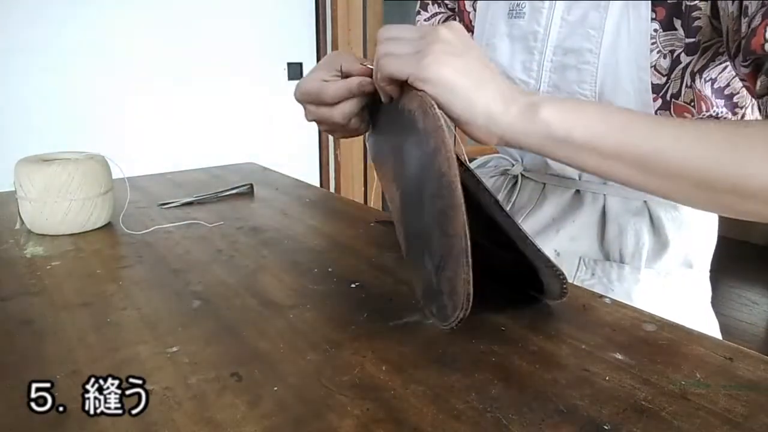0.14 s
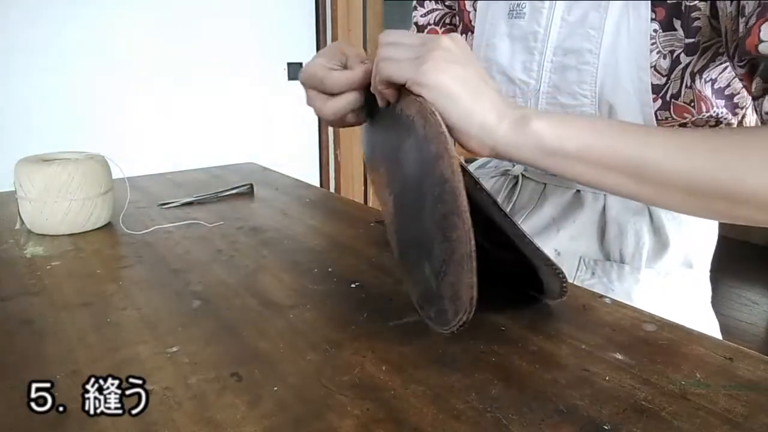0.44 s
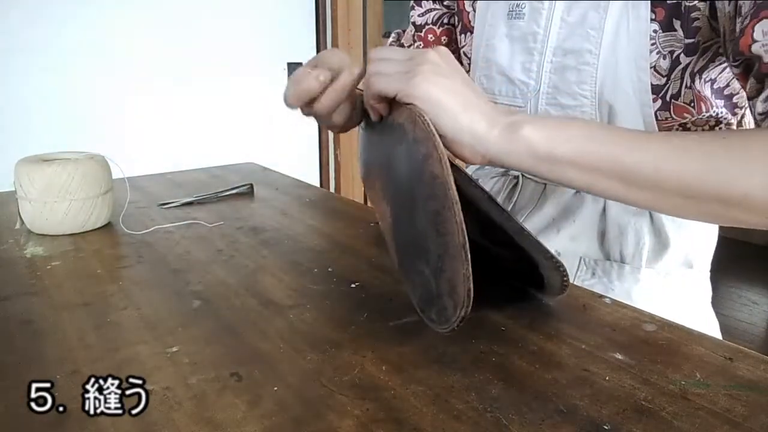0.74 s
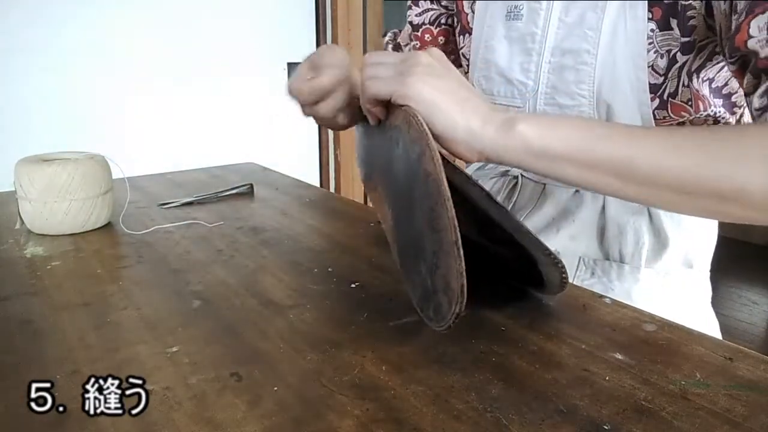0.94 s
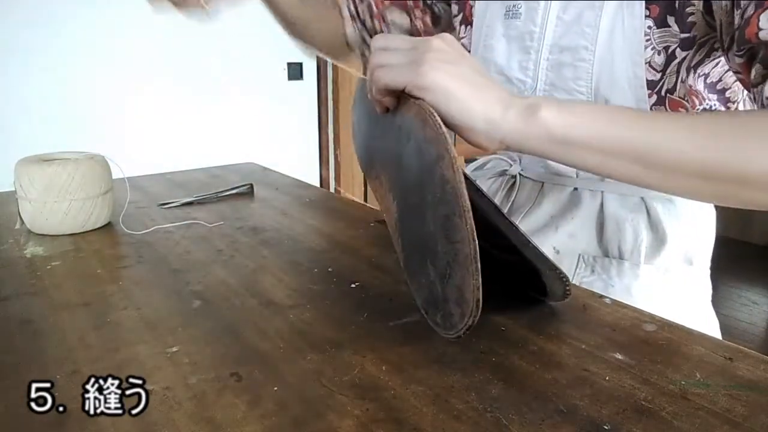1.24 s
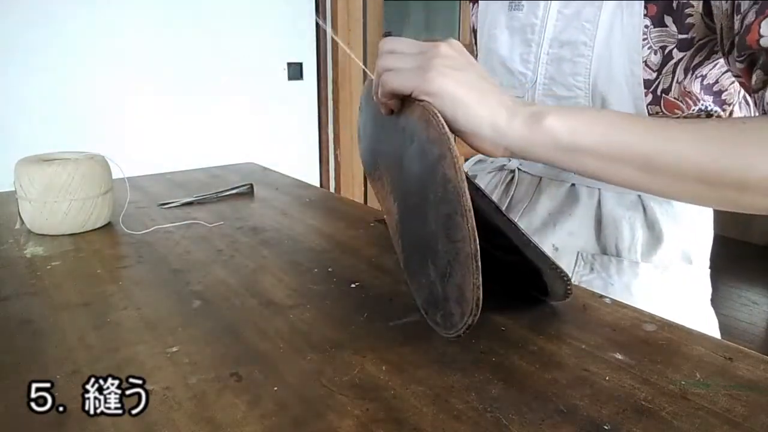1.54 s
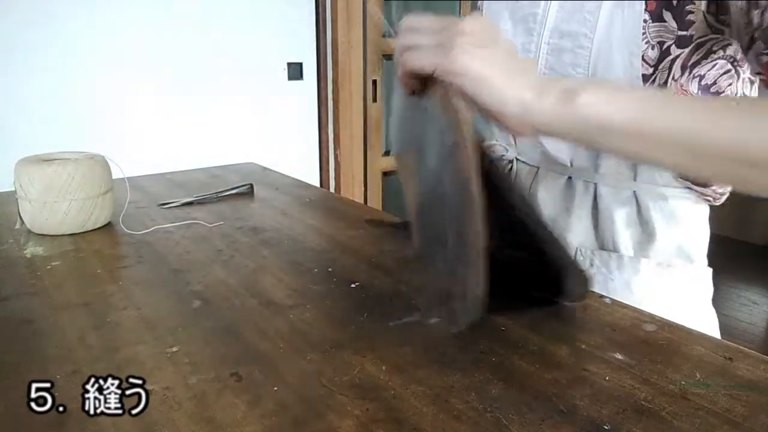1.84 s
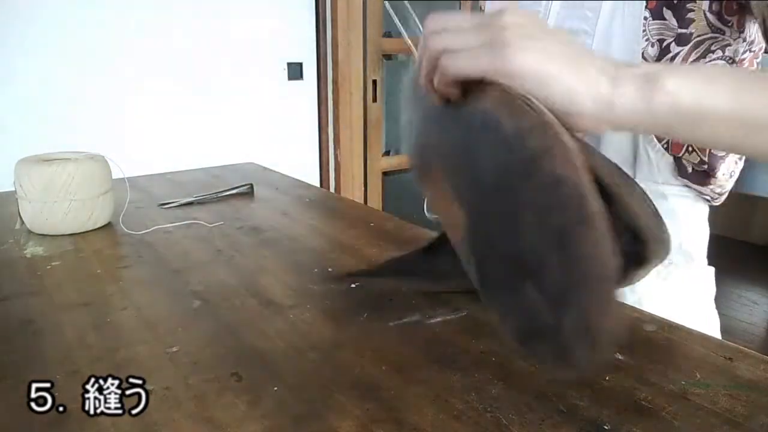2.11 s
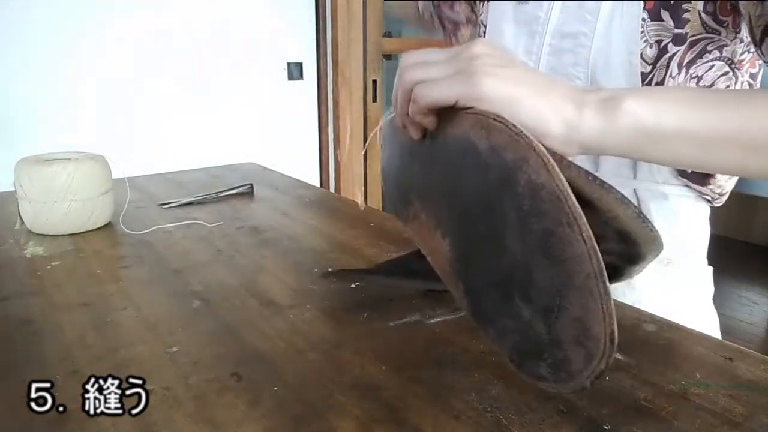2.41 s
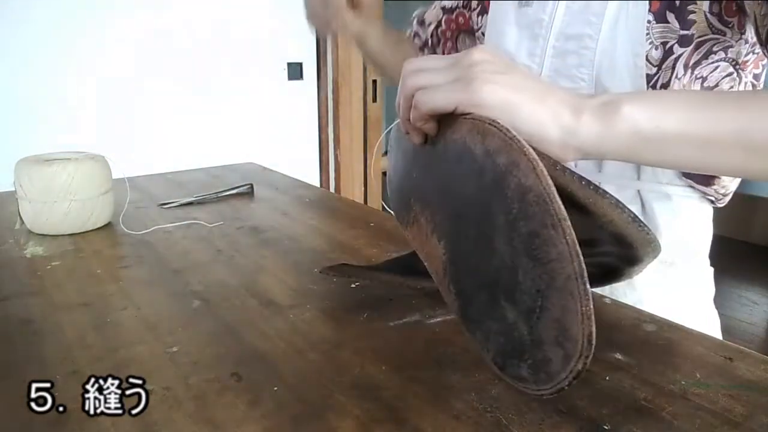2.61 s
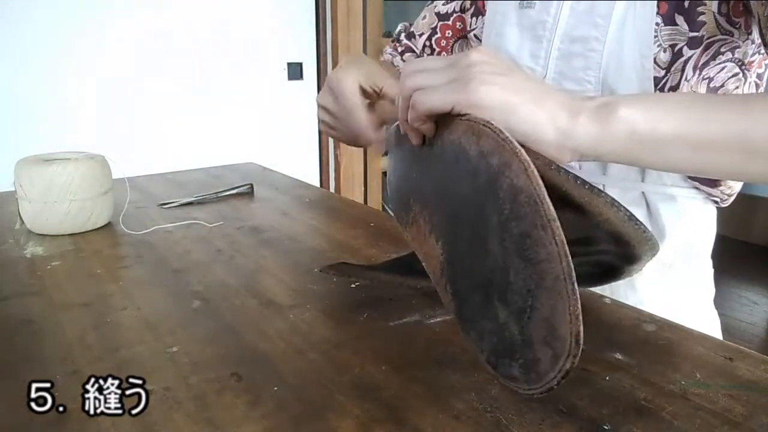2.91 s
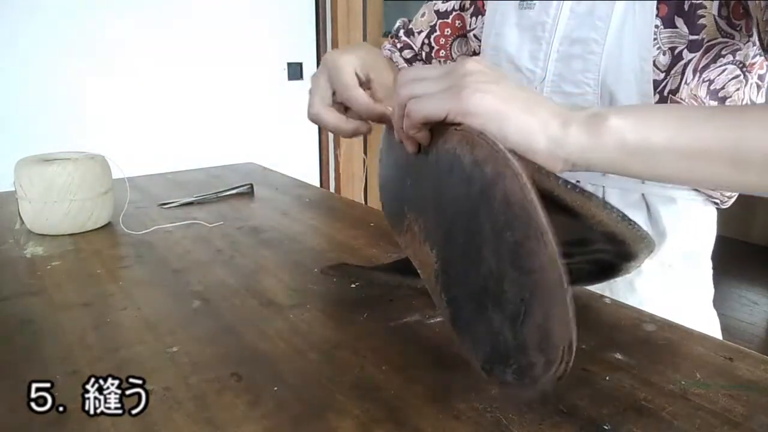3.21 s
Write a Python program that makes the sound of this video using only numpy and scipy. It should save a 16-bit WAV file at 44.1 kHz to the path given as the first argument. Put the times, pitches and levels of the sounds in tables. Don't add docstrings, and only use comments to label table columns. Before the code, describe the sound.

Thread is drawn through stiff leather with one long airy hiss, after low thumps on a wooden table; then leather scuffs, dull knocks and small ticks follow, ending with a heavy thump. Quiet small room, close stereo recorder.

```python
import sys
import numpy as np
from scipy import signal
from scipy.fft import rfft, irfft, next_fast_len
from scipy.io import wavfile
from scipy.ndimage import uniform_filter1d

SR = 44100
rng = np.random.default_rng(int(sys.argv[2]) if len(sys.argv) > 2 else 0)


def invert_db(x):
    u = np.asarray(x, float) / 20
    return 10 ** u


def generate_wav(signal):
    frames = np.transpose(np.atleast_2d(signal))
    scaled = np.clip(frames, -1, 1) * 32767
    pcm = np.round(scaled).astype(np.int16)
    wavfile.write(sys.argv[1], SR, pcm)


N = 147735

# frequency in Hz, density in dB per Hz.
HISS_SPECTRUM = [(12, -43), (20, 0), (60, -12.5), (146, -19.5), (357, -27), (600, -29), (2500, -35),
                 (6910, -35.5), (16000, -34)]
# time in seconds, scuff level in dB, table rumble relative to it in dB,
# the sheet's lowest mode relative to its other modes in dB.
SHIFT = [(0, -62.5, -5, -3), (.5, -87, 6.5, 17.5), (.8, -80, 3, 10), (1.0, -56.5, 5, -6),
         (1.2, -58, 2.5, 0.5), (1.5, -53.5, 6, -3.5), (1.7, -57.5, -6.5, 2.5), (1.85, -55.5, -1.5, 6),
         (1.98, -53, -9, 5), (2.07, -50, 1, 3.5), (2.15, -52, 4, 2), (2.3, -56, -0.5, -2),
         (2.55, -53.5, -13, -7), (2.85, -62, -13, -3), (2.97, -53, -3.5, -12), (3.1, -64, -2, -10),
         (3.25, -52, 10.5, 13.5), (3.35, -51, -1.5, -2)]
# frequency in Hz, width in Hz, level in dB.
LEATHER_MODES = [(289, 83, -0.5), (541, 88, 1), (743, 118, -2), (1070, 370, -6), (1390, 690, -11)]
# frequency in Hz, level in dB, T60 in seconds.
TABLE_HELD = [(55.6, -12, 0.17), (92, -5, 0.1), (132.6, -0.5, 0.09), (190, -13.5, 0.11)]
# time in seconds, level in dB, lower resonances relative to it in dB,
# edge scrape relative to it in dB.
DRAG = [(.93, -59.5, 2.5, -3), (.97, -52.5, 5, -8), (1.15, -52, 1, -7), (1.26, -51.5, 3.5, -3),
        (1.3, -47.5, 1, -12), (1.45, -47, 2, -6), (1.6, -48.5, 1, -8), (1.74, -47.5, -0.5, -5),
        (1.82, -48.5, -1.5, -6.5), (1.9, -51, -1, -0.5), (1.97, -48, -1.5, -1.5), (2.04, -47, -0.5, -3.5),
        (2.135, -53.5, 0.5, -1), (2.16, -57, 3, 0), (2.3, -63, 3, 1.5)]
# start in seconds, length in seconds, level in dB,
# lower resonances relative to it in dB.
BRUSHES = [(0, 0.025, -64, -7), (.27, 0.077, -65, -10), (0.428, 0.082, -59.5, -3), (0.515, 0.036, -57.5, 7),
           (2.196, 0.09, -70, -9), (2.347, 0.31, -64.5, -5), (2.883, 0.073, -62, -14),
           (2.942, 0.06, -59, 5), (3.008, 0.075, -64, 2), (3.092, 0.037, -66, 5), (3.27, 0.11, -55, -0.5)]
# frequency in Hz, width in Hz, level in dB.
HOLE_MODES = [(2500, 1400, -8.5), (3700, 1380, -3), (4735, 800, -6), (6640, 1600, -4), (8000, 2770, 0.5),
              (9800, 960, -5.5), (11260, 2200, -7), (14000, 4000, -10.5)]
# frequency in Hz, width in Hz, level in dB.
EDGE_MODES = [(1790, 2700, -7), (2900, 1100, -3), (5380, 1200, -1.5), (6200, 620, -2.5)]
# start in seconds, peak in dB, contact in seconds, share of the upper modes in dB.
THUMPS = [(0.163, -66, 0.01, -6), (0.276, -14, 0.012, -7.5), (0.371, -30.5, 0.014, -0.5),
          (0.504, -25, 0.016, -4.5), (0.545, -29, 0.026, 11), (0.618, -38.5, 0.0084, -3.5),
          (0.659, -48, 0.0077, -14), (0.867, -38, 0.021, -16), (0.965, -23.5, 0.019, -7.5),
          (1.016, -25, 0.012, -11), (1.215, -48.5, 0.006, 8.5), (1.288, -37.5, 0.012, 5),
          (1.331, -45, 0.012, 10), (1.439, -40, 0.0097, 4.5), (1.531, -37, 0.0071, -1.5),
          (2.037, -47.5, 0.0093, 10), (2.192, -34, 0.0085, 1.5), (2.204, -29, 0.0078, -9),
          (2.419, -33.5, 0.017, 4), (2.76, -53, 0.0069, -15), (2.892, -40, 0.011, 4),
          (2.954, -42, 0.012, 9.5), (3.108, -36.5, 0.014, 3), (3.183, -7.5, 0.0086, 1)]
# frequency in Hz, level in dB, T60 in seconds.
TABLE_LOW = [(143, 0, .16)]
# frequency in Hz, level in dB, T60 in seconds.
TABLE_LEGS = [(48, -28, .35), (94, -26, .3), (123, 3.5, .035)]
# frequency in Hz, level in dB, T60 in seconds.
TABLE_MID = [(206.3, -10, 0.2), (228.3, -8.5, 0.29), (259.6, -7.5, 0.22), (320, -13, 0.19)]
# frequency in Hz, level in dB, T60 in seconds.
TABLE_HIGH = [(458, -39, 0.18), (550, -41.5, 0.25), (859, -31, 0.091), (1195, -36.5, 0.047)]
# frequency in Hz, level in dB, T60 in seconds.
TABLE_RIM = [(513, -37, 0.13), (601, -37.5, 0.18), (937, -38, 0.21), (1400, -32, .04)]
# start in seconds, peak in dB, ring in Hz, width in Hz.
KNOCKS = [(.49, -57, 596, 150), (1.861, -45.5, 710, 500), (1.986, -52, 890, 900), (2.037, -48, 600, 400),
          (2.057, -42.5, 770, 700), (2.066, -45, 690, 500), (2.074, -49, 880, 800), (2.095, -41, 670, 500),
          (2.128, -43.5, 790, 700), (2.134, -49.5, 890, 800), (2.141, -47, 700, 700),
          (2.175, -50, 1100, 500), (2.196, -46, 600, 500), (2.2078, -35, 765, 450), (2.208, -53, 1400, 500),
          (2.217, -43, 780, 700), (2.33, -56, 586, 400), (2.3765, -40.5, 940, 845),
          (2.428, -46.5, 1090, 890), (2.508, -47, 1000, 810), (2.566, -54, 886, 700),
          (2.645, -54, 795, 600), (2.8945, -43, 895, 1400), (2.085, -51, 890, 600), (2.108, -51, 595, 500),
          (2.963, -49, 600, 500), (2.985, -49, 657, 500), (3.06, -54.5, 695, 500), (3.11, -50, 700, 600)]
# start in seconds, peak in dB, ring in Hz, width in Hz.
BUMPS = [(.895, -52, 68.6, 16), (1.21, -46, 225, 35), (1.215, -58, 292, 50), (1.285, -49, 59.6, 27),
         (1.33, -50, 87.5, 20), (1.352, -55, 290, 45), (1.44, -48.5, 108.6, 28), (1.475, -56, 190, 39),
         (1.535, -50, 92, 16), (1.59, -54, 242, 58), (1.665, -56, 350, 35), (1.885, -47.5, 250, 42),
         (2.21, -40.5, 108, 26), (3.187, -40, 660, 400), (2.385, -52.5, 302, 99)]
# start in seconds, peak in dB, ring in Hz, width in Hz, pan in dB.
TICKS = [(2.2066, -34.5, 7100, 3500, -1), (2.2072, -43.5, 2700, 700, -2), (2.2160, -39, 7460, 4000, 0),
         (2.2165, -46, 2600, 900, 8), (2.3620, -42, 7000, 5000, -1), (2.3768, -33.5, 7000, 6000, 0),
         (2.3770, -47, 3200, 1500, -7), (2.4294, -49, 3500, 3000, 2), (2.8942, -46, 4360, 1500, 3),
         (2.8944, -44, 7500, 4000, -3), (2.9635, -49.5, 2730, 1200, -2), (2.9640, -42, 7000, 4000, 0),
         (2.978, -55, 2900, 1210, 0), (3.0238, -34.5, 7750, 3000, 4), (3.0245, -45, 12300, 3000, 4),
         (3.118, -50, 2680, 800, 2), (3.1815, -43.5, 4930, 1210, -1), (3.1815, -45.5, 8000, 2000, -4),
         (3.2945, -47.5, 4230, 1790, 0), (3.3066, -42, 7400, 7000, 1), (3.3156, -34, 4800, 3600, -5),
         (3.3283, -39.5, 7740, 1800, 7), (3.3284, -41, 5650, 1480, -4), (3.3416, -39, 5700, 2500, -2)]

HISS_DB, ALIKE_BELOW_HZ = -50.5, 48
SCUFFS_PER_S, SCUFF_SPREAD_DB, SCUFF_FLICKER_DB = 2000, 2.5, 1.2
SHAKES_PER_S, SHAKE_SPREAD_DB = 150, 1.5
SLIPS_PER_S, SLIP_SPREAD_DB, SLIP_APART = 6000, 2.2, .62
DRAG_FLICKER_DB, HOLE_SWAY_DB = .8, .9
BRUSH_EDGE_S, BRUSH_FLICKER_DB, BRUSH_SCRAPE_DB = .03, 2.5, -8.5
THREAD_PAN_DB, LOWER_PAN_DB, TABLE_PAN_DB = 2.5, -1.5, -1.9
THUMP_LAG_S, THUMP_GAIN_DB, SKIN_SHARE = .0025, 9.5, 0.14
TICK_T60_S, KNOCK_T60_S, BUMP_T60_S = 0.007, 0.022, 0.059
RATTLE, RATTLE_ALIKE, TAP_GAIN_DB, TAP_LAG_S = 1.1, .7, 4, .0004
ROOM_T60_S, ROOM_DB = .2, -11
MIC_LOW_HZ, TOP_HZ, OFFSET = 38, 15740, -.0005
GATE_SPREAD_DB, GATE_FROM_HZ = 7.5, 2200


def unit(x):
    return x / np.sqrt(np.mean(x ** 2))


def band(x, hz, width_hz):
    hz = min(hz, .45 * SR)
    return signal.lfilter(*signal.iirpeak(hz, hz / width_hz, fs=SR), x)


def body(x, peaks):
    return sum((-1) ** k * invert_db(db) * band(x, hz, width) for k, (hz, width, db) in enumerate(peaks))


def steep(x, peaks):
    size = next_fast_len(x.shape[-1])
    f = np.fft.rfftfreq(size, 1 / SR)
    power = sum(invert_db(db) ** 2 / (1 + (2 * (f - hz) / width) ** 2) ** 2 for hz, width, db in peaks)
    return irfft(rfft(x, size) * np.sqrt(power), size)[..., :x.shape[-1]]


def ring(force, modes):
    out = 0
    for hz, db, t60 in modes:
        pole = np.exp(2j * np.pi * hz / SR - np.log(1000) / (t60 * SR))
        out = out + invert_db(db) * signal.lfilter([1], [1, -pole], force).imag
    return out


def walk(rate):
    k = int(SR / rate)
    return unit(uniform_filter1d(uniform_filter1d(rng.standard_normal(N), k), k))


def curve(rows, axis):
    rows = np.array(rows)
    return np.interp(np.arange(N) / SR, rows[:, 0], rows[:, axis])


def grains(per_s, spread_db):
    chance, sign, size = rng.random((3, N))
    return (chance < per_s / SR) * np.sign(sign - .5) * invert_db(-spread_db * np.log(1.003 - size))


def two_ports(per_s, spread_db, apart):
    a, b = (grains(per_s, spread_db) for _ in range(2))
    return np.array([a + apart * b, a - apart * b])


def pan(x, db):
    return x * invert_db(np.array([[db / 2], [-db / 2]]))


def hiss():
    hz = np.maximum(np.fft.rfftfreq(N, 1 / SR), 1)
    spectrum = np.array(HISS_SPECTRUM)
    gain = invert_db(np.interp(np.log(hz), np.log(spectrum[:, 0]), spectrum[:, 1]))
    alike = 1 / (1 + (hz / ALIKE_BELOW_HZ) ** 2)
    mid, side = rfft(rng.standard_normal((2, N))) * gain * np.sqrt([1 + alike, 1 - alike])
    return invert_db(HISS_DB) * unit(irfft(np.array([mid + side, mid - side]), N))


def leather():
    level_db = curve(SHIFT, axis=1) + SCUFF_FLICKER_DB * walk(24)
    rub = two_ports(SCUFFS_PER_S, SCUFF_SPREAD_DB, .5)
    scuff = invert_db(curve(SHIFT, axis=3)) * body(rub, LEATHER_MODES[:1]) - body(rub, LEATHER_MODES[1:])
    push = uniform_filter1d(grains(SHAKES_PER_S, SHAKE_SPREAD_DB), size=120)
    shake = unit(ring(push, TABLE_HELD))
    return invert_db(level_db) * unit(scuff), invert_db(level_db + curve(SHIFT, axis=2)) * shake


def hole(peaks, pan_db):
    out = 0
    for peak in peaks:
        slips = two_ports(SLIPS_PER_S, SLIP_SPREAD_DB, SLIP_APART)
        out = out + steep(slips, [peak]) * invert_db(HOLE_SWAY_DB * walk(5.6))
    return pan(out, pan_db) * invert_db(DRAG_FLICKER_DB * walk(23))


def thread():
    t = np.arange(N) / SR
    upper = invert_db(curve(DRAG, axis=1))
    lower = upper * invert_db(curve(DRAG, axis=2))
    edge = upper * invert_db(curve(DRAG, axis=3))
    fumble_db = BRUSH_FLICKER_DB * walk(85)
    for s, length, db, lower_db in BRUSHES:
        fade = np.clip(np.minimum(t - s, s + length - t) / BRUSH_EDGE_S + .5, 0, 1)
        brush = invert_db(db + fumble_db) * fade ** 2
        upper = upper + brush
        lower = lower + brush * invert_db(lower_db)
        edge = edge + brush * invert_db(BRUSH_SCRAPE_DB)
    high = hole(HOLE_MODES[3:], THREAD_PAN_DB)
    low = hole(HOLE_MODES[:3], LOWER_PAN_DB)
    scrape = hole(EDGE_MODES, LOWER_PAN_DB)
    return (upper * high + lower * low + edge * scrape) / np.std(high)


def table():
    low, mid, high = np.zeros((3, N + SR))
    t = np.arange(2048) / SR
    for s, db, contact_s, high_db in THUMPS:
        push, touch = (t * np.exp(-4 * t / max(c, .0005)) for c in (contact_s, SKIN_SHARE * contact_s))
        push, touch = push / push.sum(), touch / touch.sum()
        i = int((s + THUMP_LAG_S) * SR)
        size = -invert_db(db + THUMP_GAIN_DB)
        low[i:i + len(t)] += size * push
        mid[i:i + len(t)] += size * invert_db(high_db) * push
        high[i:i + len(t)] += size * invert_db(high_db) * touch
    out = ring(low, TABLE_LOW) - ring(low, TABLE_LEGS) + ring(mid, TABLE_MID)
    out = out + ring(high, TABLE_HIGH) - ring(high, TABLE_RIM)
    return signal.lfilter(*signal.butter(2, MIC_LOW_HZ, "high", fs=SR), out)[:N]


def tap(db, hz, width_hz, t60):
    t = np.arange(8192) / SR
    a, b = rng.standard_normal((2, len(t)))
    alike, unlike = np.sqrt((1 + RATTLE_ALIKE) / 2), np.sqrt((1 - RATTLE_ALIKE) / 2)
    noise = alike * a + unlike * b * np.array([[1], [-1]])
    rattle = RATTLE * np.sqrt(2 * np.log(1000) / (t60 * SR)) * invert_db(-60 * t / t60) * noise
    out = band(band((t == 0) + rattle, hz, width_hz), hz, width_hz)
    return invert_db(db + TAP_GAIN_DB) * out / np.abs(out).max()


def taps(rows, t60):
    out = np.zeros((2, N + SR))
    for s, db, hz, width_hz, *pan_db in rows:
        one = pan(tap(db, hz, width_hz, t60), pan_db[0] if pan_db else TABLE_PAN_DB)
        i = int((s + TAP_LAG_S) * SR)
        out[:, i:i + one.shape[1]] += one
    return out[:, :N]


def room(x):
    t = np.arange(int(.4 * SR)) / SR
    tail = rng.standard_normal((2, len(t))) * invert_db(-60 * t / ROOM_T60_S) * (t > .002)
    tail /= np.sqrt(np.sum(tail ** 2, axis=1, keepdims=True))
    return x + invert_db(ROOM_DB) * signal.fftconvolve(x, tail, axes=1)[:, :N]


def scene():
    scuff, shake = leather()
    air = pan(scuff, TABLE_PAN_DB) + thread() + taps(KNOCKS, KNOCK_T60_S) + taps(TICKS, TICK_T60_S)
    wood = pan(table() + shake, TABLE_PAN_DB) + taps(BUMPS, BUMP_T60_S)
    return room(air) + wood + hiss()


def roll_off(x):
    return signal.sosfilt(signal.butter(12, 16790, fs=SR, output="sos"), x)


def record(dry):
    hz, t, z = signal.stft(dry, SR, nperseg=2048)
    power = np.abs(z) ** 2
    patch = unit(uniform_filter1d(rng.standard_normal((len(hz) // 7 + 1, len(t))), 2))
    patch = np.repeat(patch, 7, axis=0)[:len(hz)]
    usual = np.exp(uniform_filter1d(np.log(power + 1e-30), size=141, axis=1))
    bar = usual * invert_db(GATE_SPREAD_DB * patch) ** 2
    keep = ((power > bar) | (hz < GATE_FROM_HZ)[:, None]) & (hz < TOP_HZ)[:, None]
    mix = signal.istft(z * keep, SR, nperseg=2048)[1][:, :N]
    return roll_off(mix + OFFSET)


dry = scene()
out = record(dry)
generate_wav(out)
```